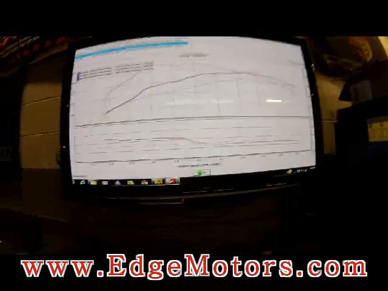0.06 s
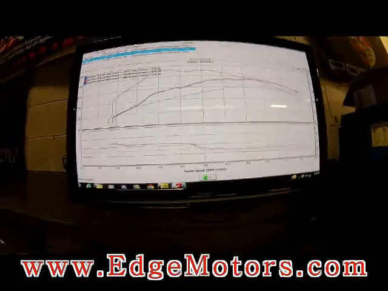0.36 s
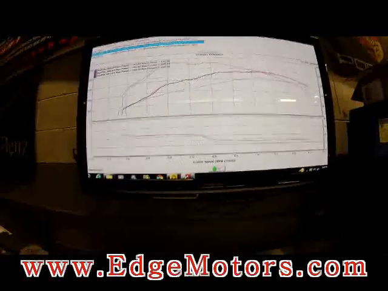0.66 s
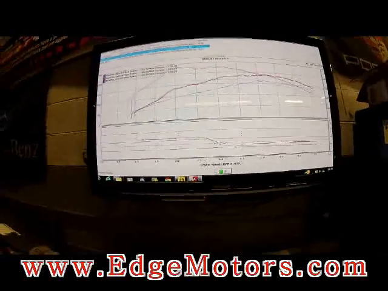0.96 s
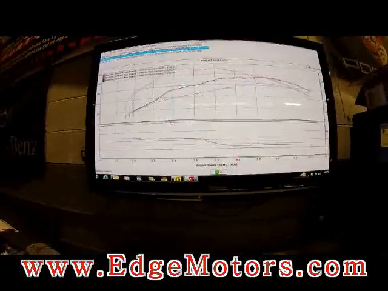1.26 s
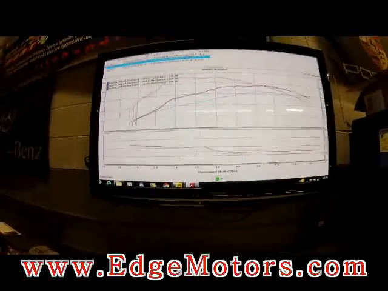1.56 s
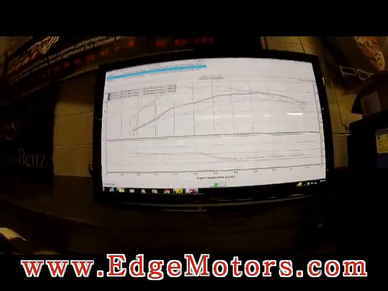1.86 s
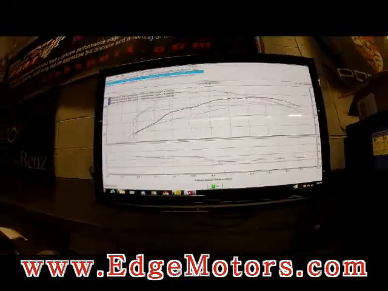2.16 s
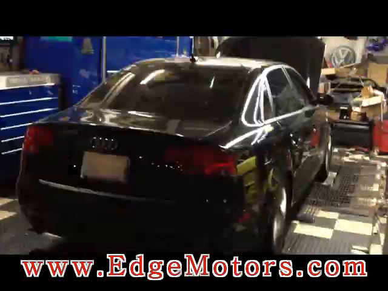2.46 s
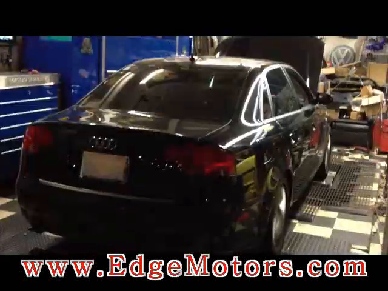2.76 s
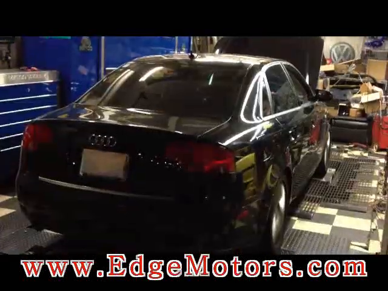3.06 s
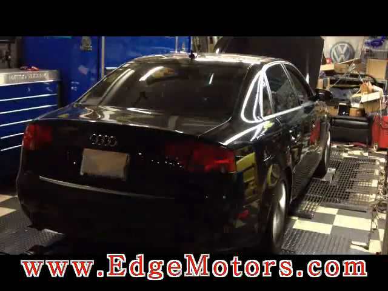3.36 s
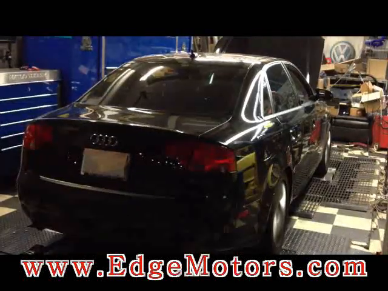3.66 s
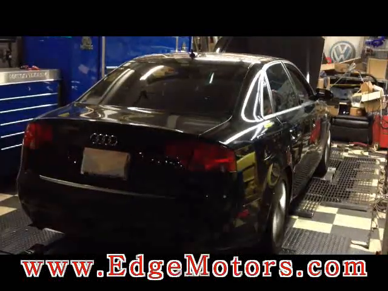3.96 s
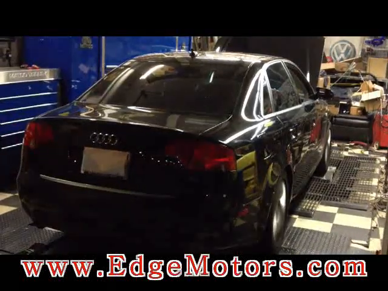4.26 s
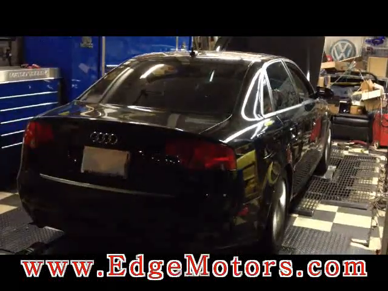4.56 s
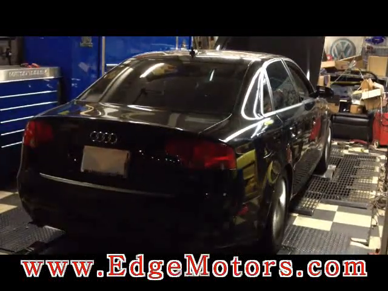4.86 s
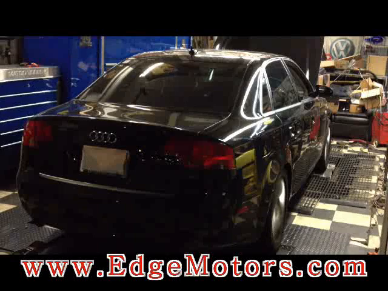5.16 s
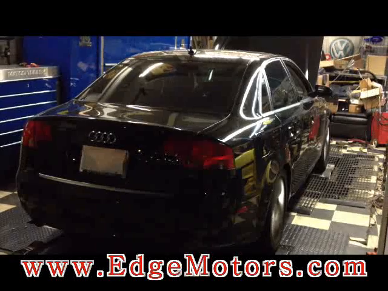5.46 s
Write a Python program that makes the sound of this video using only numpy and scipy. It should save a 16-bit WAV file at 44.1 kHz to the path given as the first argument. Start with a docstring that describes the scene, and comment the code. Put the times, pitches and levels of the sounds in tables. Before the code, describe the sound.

For the first 2.4 seconds, desk fans give a quiet low rush with an electrical hum and faint hiss. Light plastic knocks come irregularly, several in the first second and two more at about 1.3 and 1.7 seconds. At 2.4 seconds a sharp click cuts to a split second of silence.

At about 2.5 seconds a turbocharged four-cylinder car engine comes in abruptly, loud and already at full throttle. Its revs climb steadily, with exhaust boom, rasp, clatter and intake hiss reflecting off hard workshop walls. Above it, tyres on test rollers make a throbbing whine that rises in pitch and is strongest around 4.3 seconds. A cooling fan's steady tones sink under the engine at about 3.5 seconds. The engine grows harsher, surges at 5 seconds, falters briefly, recovers and eases slightly as the sound ends near 5.6 seconds.

```python
"""A turbocharged four-cylinder pulls at full throttle on a workshop chassis dyno. Its firings boom and
ring the exhaust, the engine rasps and clatters, the intake hisses, and hard walls throw it all back.
Under it the tyres whine upward on the rollers and a cooling fan sinks away. The lead-in is a quieter
scene: fans hum by the monitor desk and plastic knocks, until a click and a beat of silence."""
import sys
import numpy as np
from scipy import signal
from scipy.fft import rfft, irfft, next_fast_len
from scipy.io import wavfile
from scipy.ndimage import uniform_filter1d

SR = 44100
rng = np.random.default_rng(int(sys.argv[2]) if len(sys.argv) > 2 else 0)


def transcribe(signal):
    """Save signal, clipped to [-1, 1], as a 16-bit WAV file at the path in sys.argv[1]."""
    frames = np.atleast_2d(signal).T
    limited = np.clip(frames, -1, 1)
    pcm = np.round(limited * 32767).astype(np.int16)
    wavfile.write(sys.argv[1], SR, pcm)


N = 246959
TIME = np.arange(N) / SR
DESK_END_S, PULL_START_S = 2.4174, 2.466

# crank speed through the pull: t/s, f/Hz
REV_RAMP = [(2.48, 60.66), (3.0, 64.44), (3.5, 68.68), (4.0, 73.08), (4.5, 78.5), (4.93, 84.18),
            (5.06, 87.56), (5.59, 94.1)]
# the engine pulls evenly, surges, falters, recovers and eases off: t/s, effort/dB
EFFORT_RIDE = [(2.48, 0), (3.8, -0.55), (4.6, 0.5), (4.82, 0.4), (5.0, 1.5), (5.13, -1.2), (5.33, 0),
               (5.48, -0.8), (5.6, -3.5)]
# level laws of the engine layers: level/dB at MID_REVS_HZ, dB per doubling of revs, dB per dB of effort
MID_REVS_HZ = 75
EXHAUST_LAW, RASP_LAW = (-23, 2, 0.85), (-22, 11.5, 0.7)
CLATTER_LAW, HISS_LAW = (-23.5, 16.7, 0.69), (-23, 12, 0.91)
# the same columns for crank orders 1 to 4; order 2 is the firing rate
BOOM_ORDER_LAWS = [(-41, 29.5, 0.5), (-28.5, 35.5, 1.6), (-32.5, -6, 1.4), (-37.5, 9.5, 1.8)]
# resonances and a null of pipe and workshop that the orders sweep through: f/Hz, width/Hz, gain/dB
PIPE_AND_ROOM_MODES = [(157, 43.5, 8), (186.7, 10, 2.5), (219, 20, -4.5), (269, 28, 10), (291, 25, 4),
                       (348.2, 7.5, 12.5), (368.7, 13, 17.5), (443, 22, 4)]
# half and whole crank orders from the unequal cylinders: order, relative level/dB
GROWL_ORDERS = [(3.5, -17), (4.5, 3), (5, 6.5), (5.5, 1.5), (6, 4), (7, -2), (8, 2.5)]
# EQ of exhaust body, midrange rasp, block clatter and intake hiss: f/Hz, relative level/dB
EXHAUST_EQ = [(40, -31), (110, -14.5), (215, -5), (285, -1.5), (355, -4), (430, -2.5), (500, -9.5),
              (580, -12), (680, -12.5), (900, -15.5), (1500, -60)]
RASP_EQ = [(450, -11.5), (680, -16.5), (780, -9.5), (870, -3), (1050, -2), (1240, 0.5), (1400, -3),
           (1700, -3), (2000, -5), (2500, -18), (3500, -44)]
CLATTER_EQ = [(1300, -21), (1800, -9.5), (2000, -4.5), (2200, -2.5), (2450, 1.5), (2850, -4), (3250, -6),
              (3900, -5), (4600, -4.5), (4950, -14), (6500, -40)]
INTAKE_EQ = [(4900, -11), (5200, -9.5), (5600, -5.5), (6100, -3), (6350, -2.5), (6650, 0.5), (7400, 0.5),
             (8000, 2), (8300, 0.5), (8650, 3.5), (9050, 1.5), (9600, -8), (10000, -1.5), (10350, -15.5)]
# brief swells in the roller whine: t/s, length/s, gain/dB
ROLLER_SWELLS = [(3.017, 0.048, 6), (3.18, 0.044, 5.5), (4.074, 0.087, 4.5)]
# blade tones of the car's cooling fan before they fade: f/Hz, level/dB, waver/dB
COOLING_FAN_TONES = [(511.5, -35.5, 1.5), (1023, -41, 2), (1660, -35, 1.5), (2046, -40.5, 2)]
# EQ of the desk fans' low rush and their hiss: f/Hz, relative level/dB
FAN_AIR_EQ = [(11, -28), (18, 0.5), (87, -11), (122, -4), (166, -6), (202, -10.5), (221, -10), (284, -7.5),
              (316, -11.5), (352, -8.5), (421, -11.5), (460, -7.5), (503, -10.5), (613, -9.5), (1300, -37),
              (1690, -69), (2860, -120)]
FAN_HISS_EQ = [(1200, -9), (1500, -9.5), (1950, -3), (2450, -6), (2820, 0), (3450, -10.5), (3800, -7.5),
               (4300, -16.5), (5000, -20), (6100, -26.5), (7700, -20.5), (8250, -14.5), (8600, -18.5),
               (9150, -11.5), (9550, -17), (10300, -21.5)]
# narrow resonances of the fan housings: f/Hz, width/Hz, level/dB
HOUSING_RINGS = [(2874, 110, -59), (3840, 120, -66), (9200, 200, -67)]
# fan and mains hum: f/Hz, level/dB, waver/dB
HUM_TONES = [(25.5, -35, 3), (60, -40, 1), (120, -36.5, 1), (200, -34.5, 1.5), (240, -44, 2), (280, -39, 2),
             (398, -47, 2), (480, -47, 2)]
# knocks at the desk, ending on the click: t/s, peak level/dB, hardness/(dB per octave)
DESK_KNOCKS = [(0.024, -22, -7), (.307, -20, -32), (.498, -17, -18), (0.5078, -20.5, 1), (.69, -27, 4),
               (.888, -17, -30), (1.275, -23, -25), (1.715, -19.5, -24), (2.4157, -6, 3)]
# the plastic they ring: f/Hz, relative level/dB, t60/s
PLASTIC_MODES = [(607, 5, 0.036), (1135, 3.5, 0.03), (1380, -11, 0.022), (1620, -6, .03), (2850, -11, .015),
                 (4400, -9, 0.0033), (7460, -16, .003)]


def engine():
    """Firings and gas drive the exhaust, block and turbo intake; each layer rides revs and effort."""
    crank_hz = automation(REV_RAMP)
    crank = turns_of(crank_hz * (1 + .0015 * drift(20)))
    pulses = firings(crank, scatter=0.35, jitter_s=0.00048)
    layers = [(exhaust(pulses, crank, crank_hz), EXHAUST_LAW), (rasp(pulses, crank, crank_hz), RASP_LAW),
              (clatter(pulses, crank), CLATTER_LAW), (intake(crank), HISS_LAW)]
    return boom(crank, crank_hz) + sum(layer * undb(level_db(law, crank_hz)) for layer, law in layers)


def firings(crank, scatter, jitter_s):
    """Two pulses a turn from four unequal cylinders; no two hits match in weight or timing."""
    cylinder_db = [-1.0, -3.0, -6.0, -6.5]
    due = np.flatnonzero(np.diff(np.floor(2 * crank)))
    size, late = rng.uniform(-0.99, 1, (len(due), 2)).T
    hits = np.clip(due + (jitter_s * SR * late).astype(int), 0, N - 1)
    pulses = np.zeros(N)
    pulses[hits] = undb(np.resize(cylinder_db, len(due))) * (1 + scatter * size)
    return unit(pulses - pulses.mean())


def gas(crank, pump_db=0):
    """Fluttering turbulence; pump_db makes it swell with each firing."""
    return unit(noise() * undb(pump_db * np.cos(4 * np.pi * crank) + 0.61 * drift(25.054)))


def boom(crank, crank_hz):
    """The low end: four crank orders leave the tailpipes as a pressure wave, the top two less steady."""
    wave = np.zeros(N)
    for order, law, waver_db in zip((1, 2, 3, 4), BOOM_ORDER_LAWS, (.7, .5, 1.5, 2)):
        db = level_db(law, crank_hz) + resonance_db(order * crank_hz) + waver_db * drift(30)
        phase = 2 * np.pi * order * crank + 0.03 * waver_db * drift(40)
        wave -= np.sqrt(2) * undb(db) * np.cos(phase)
    return wave


def exhaust(pulses, crank, crank_hz):
    """The body: firings and gas ring the pipe and echo off the walls, with a growl layered in."""
    roar = room(0.43 * pulses + gas(crank), t60=0.49, wet_db=-3.5)
    return unit(eq(roar, EXHAUST_EQ) + 0.82 * eq(growl(crank, crank_hz), EXHAUST_EQ))


def growl(crank, crank_hz):
    """Higher crank orders, smeared by uneven cycles, swell as they cross the resonances."""
    wave = np.zeros(N)
    for order, db in GROWL_ORDERS:
        gain = undb(db + .3 * resonance_db(order * crank_hz) + 5.1 * drift(22))
        wave += gain * np.sin(2 * np.pi * order * crank + drift(25))
    return unit(wave)


def rasp(pulses, crank, crank_hz):
    """Midrange bite: the firings hit harder as the revs climb, and the rasp flares in one rev band."""
    punch = (crank_hz / crank_hz.max()) ** 2
    drive = 0.31 * punch * pulses + gas(crank, pump_db=2.8 * punch)
    flare_db = 2.3 * bell(crank_hz, centre=84.7, width=5.6)
    return eq(room(drive, t60=0.51, wet_db=-4.5), RASP_EQ) * undb(flare_db)


def clatter(pulses, crank):
    """The hard edge: firings and gas rattle the block, with a light room tail."""
    return eq(room(0.25 * pulses + gas(crank), t60=1.0, wet_db=-12), CLATTER_EQ)


def intake(crank):
    """The top end: air hisses through the turbo intake, pumping faintly at the firing rate."""
    return eq(gas(crank, pump_db=0.5), INTAKE_EQ)


def level_db(law, crank_hz):
    """The fader of one engine layer, following revs and effort."""
    mid_db, db_per_doubling, effort_share = law
    doublings = np.log2(crank_hz / MID_REVS_HZ)
    return mid_db + db_per_doubling * doublings + effort_share * automation(EFFORT_RIDE)


def resonance_db(hz):
    """The boost or cut that pipe and workshop give a low tone."""
    return sum(db * bell(hz, centre, width) for centre, width, db in PIPE_AND_ROOM_MODES)


def rollers():
    """Tyres on knurled rollers sing upward with road speed and throb once a wheel turn."""
    start_hz, loudest_hz, cycles_per_turn = 1356, 1774, 130
    t = np.maximum(TIME - PULL_START_S, 0)
    hz = start_hz + 184 * t + 44 * t ** 2 / 2  # the rollers gather speed ever faster
    db = -27.5 - 53 * np.log2(hz / loudest_hz) ** 2
    db += sum(swell_db * bell(TIME, at, length) for at, length, swell_db in ROLLER_SWELLS)
    throb = 1 + .52 * np.sin(2 * np.pi * turns_of(hz / cycles_per_turn) + drift(8))
    whine = throb * tone(hz, db, waver_db=1.6, rate=20, slip=.25)
    halo = tone(hz, db - 10, waver_db=3, rate=110, slip=1.4)
    octave_db = db - 6 - 110 * np.log10(hz / start_hz)  # drops out early in the climb
    return whine + halo + tone(2 * hz, octave_db, waver_db=2.5, rate=45, slip=.9)


def cooling_fan():
    """The fan in front of the car holds its blade tones, which fade down under the engine."""
    fade_at_s, fade_s, fade_db = 3.33, 0.32, -14
    fade = np.clip((TIME - fade_at_s) / fade_s, 0, 1)
    blades = sum(tone(hz, db, waver_db, rate=12, slip=.35) for hz, db, waver_db in COOLING_FAN_TONES)
    return undb(fade_db * fade) * blades


def desk_fans():
    """The lead-in bed: fans push air, ring their housings and hum; one blade tone sags and sinks away."""
    air = eq(noise() * undb(0.66 * drift(60.4)), FAN_AIR_EQ) * undb(-26.5)
    hiss = eq(noise() * undb(0.59 * drift(20)), FAN_HISS_EQ) * undb(-44.5)
    rings = sum(tone(hz, db, waver_db=2, rate=width, slip=1.5) for hz, width, db in HOUSING_RINGS)
    hum = sum(tone(hz, db, waver_db, rate=5.02, slip=0.34) for hz, db, waver_db in HUM_TONES)
    sag = 1 - np.exp(-TIME / 0.605)
    blade = tone(hz=465 - 12 * sag, db=-30 - 18 * sag, waver_db=2.5, rate=9.5, slip=0.4)
    return air + hiss + rings + hum + blade


def knock(at_s, peak_db, hardness):
    """A tap rings the plastic briefly; a soft contact reaches only the low modes."""
    t = TIME[:SR // 10]
    ring = np.zeros(len(t))
    for hz, db, t60 in PLASTIC_MODES:
        tilt_db = hardness * np.log2(hz / PLASTIC_MODES[0][0])
        ring += undb(db + tilt_db - 60 * t / t60) * np.sin(2 * np.pi * hz * t)
    return np.pad(undb(peak_db) * ring / np.abs(ring).max(), (int(at_s * SR), N))[:N]


def room(x, t60, wet_db):
    """Direct sound plus a dense tail off the hard walls; rms 1."""
    t = TIME[:SR // 2]
    tail = rng.standard_normal(len(t)) * undb(-60 * t / t60) * (t > .006)
    wet = signal.fftconvolve(x, tail / np.linalg.norm(tail))[:N]
    return unit(x + undb(wet_db) * wet)


def tone(hz, db, waver_db, rate, slip):
    """A sine whose level and phase (slip, in radians) wander as its reflections add and cancel."""
    gain = np.sqrt(2) * undb(db + waver_db * drift(rate))
    return gain * np.sin(2 * np.pi * turns_of(hz) + slip * drift(rate))


def eq(x, points):
    """Shape a sound with an EQ curve, rolled off past both ends; rms 1."""
    hz, db = np.transpose(points)
    size = next_fast_len(N, True)
    f = np.maximum(np.arange(size // 2 + 1) * SR / size, 1)
    gain = undb(np.interp(np.log(f), np.log(hz), db))
    rolloff = np.minimum(f / hz[0], 1) ** 2 * np.minimum(hz[-1] / f, 1) ** 2
    return unit(irfft(rfft(x, size) * gain * rolloff, size)[:N])


def drift(rate):
    """Smooth random modulation, moving about rate times a second; rms 1."""
    hold = max(int(SR / rate), 1)
    steps = np.repeat(rng.uniform(-1, 1, N // hold + 1), hold)[:N]
    return unit(uniform_filter1d(uniform_filter1d(steps, hold), hold))


def automation(points):
    """Straight ramps between (time, value) breakpoints."""
    return np.interp(TIME, *np.transpose(points))


def turns_of(hz):
    """Turns made so far at a moving rate."""
    return np.cumsum(hz * np.ones(N)) / SR


def bell(x, centre, width):
    """A smooth hump of height 1; width is taken at half height."""
    return .5 ** ((2 * (x - centre) / width) ** 2)


def noise():
    return rng.standard_normal(N)


def undb(db):
    return 10 ** (np.asarray(db) / 20)


def unit(x):
    """Scale to rms 1."""
    return x / np.sqrt(np.mean(x ** 2))


def scene():
    """The desk cuts out on a click; after a beat of silence the pull slams in. Mono."""
    desk_gate = np.clip((DESK_END_S - TIME) / .0002, 0, 1)
    pull_gate = np.clip((TIME - PULL_START_S) / 0.0044, 0, 1) ** 2
    desk = desk_fans() + sum(knock(*row) for row in DESK_KNOCKS)
    pull = engine() + rollers() + cooling_fan()
    return (desk_gate * desk + pull_gate * pull)[None]


def record(dry):
    """A soft clip rounds the tallest peaks and a steep low-pass takes off the top."""
    ceiling, top_hz = .86, 10400
    rounded = dry / (1 + (dry / ceiling) ** 8) ** (1 / 8)
    return signal.sosfilt(signal.ellip(12, .2, 80, top_hz, fs=SR, output="sos"), rounded)


dry = scene()
out = record(dry)
transcribe(out)
```